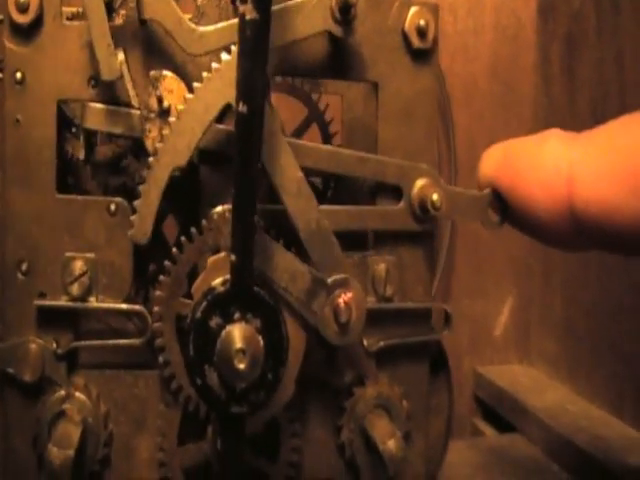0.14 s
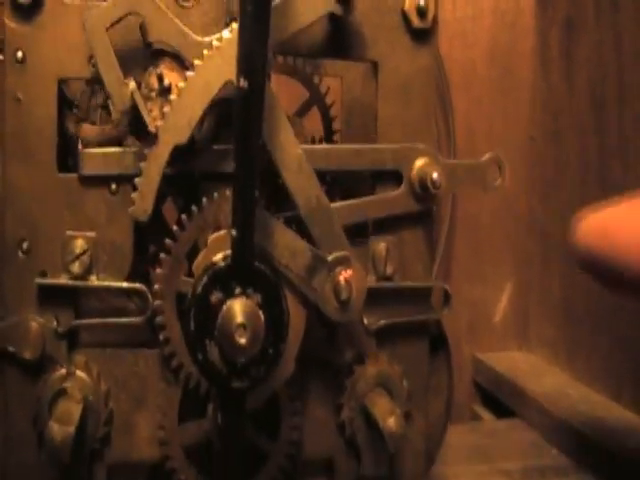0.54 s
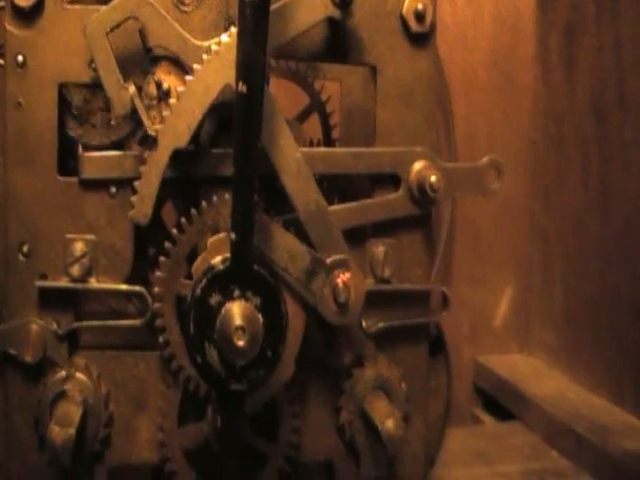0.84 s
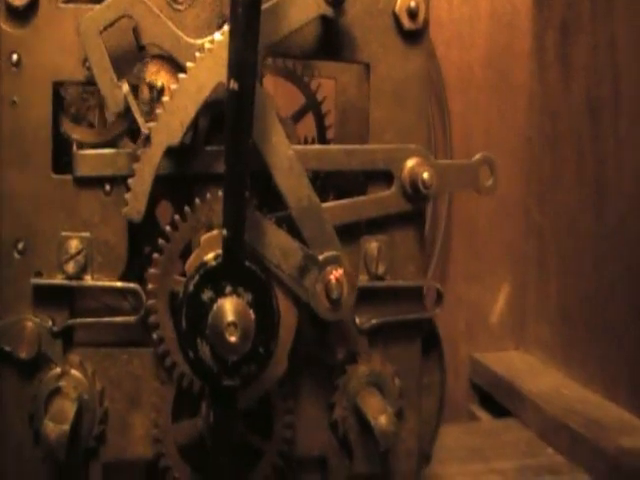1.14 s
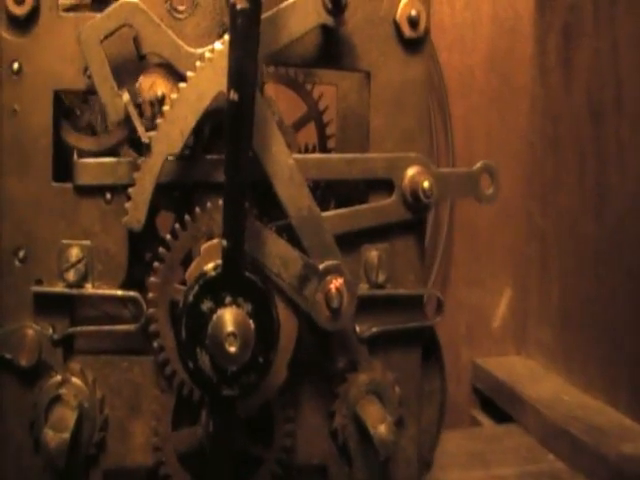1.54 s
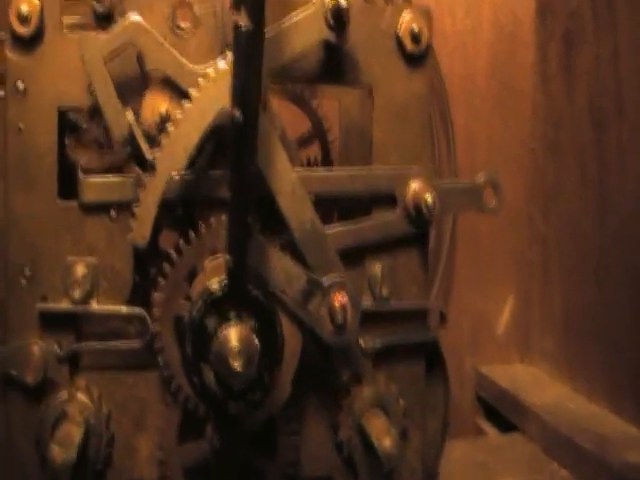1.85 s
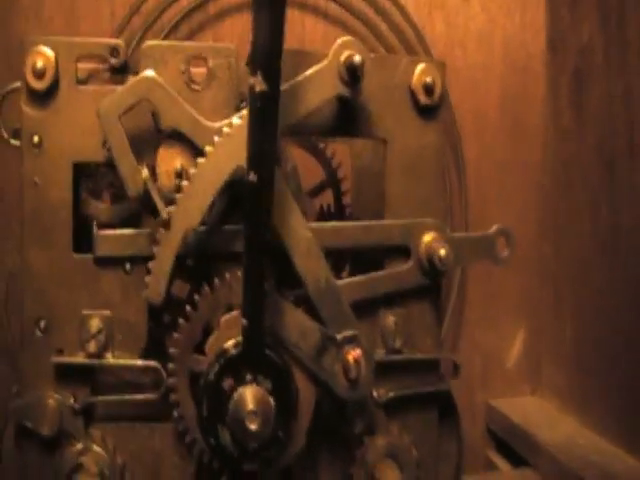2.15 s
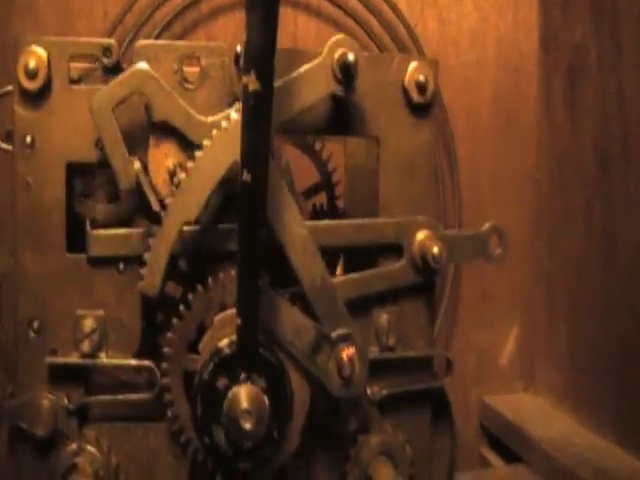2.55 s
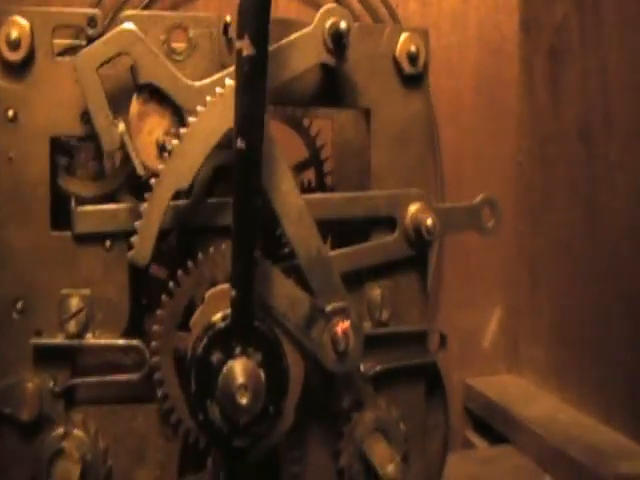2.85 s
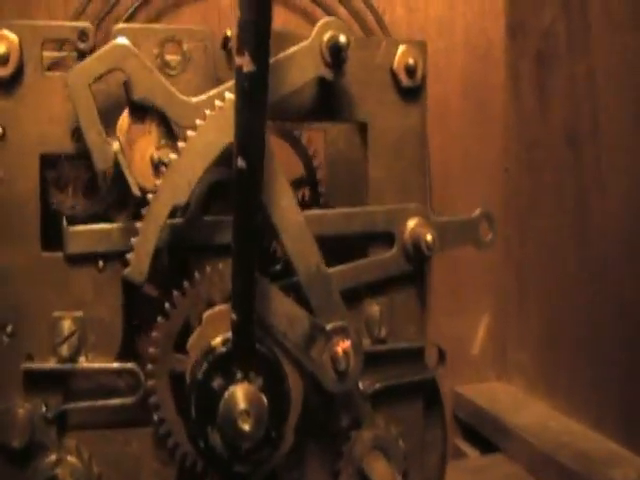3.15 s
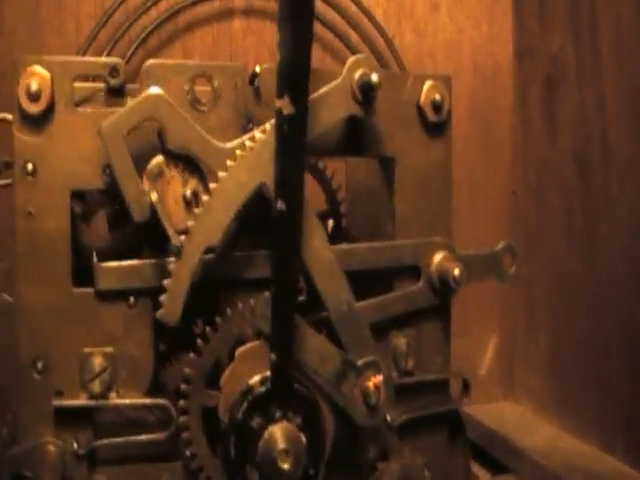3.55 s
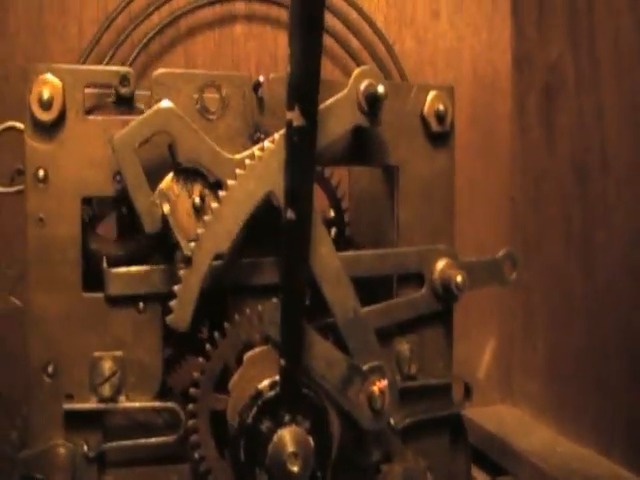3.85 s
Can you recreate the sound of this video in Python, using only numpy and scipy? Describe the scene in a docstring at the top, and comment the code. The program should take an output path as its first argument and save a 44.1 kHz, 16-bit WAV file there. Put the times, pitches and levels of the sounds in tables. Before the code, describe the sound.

Clock gears whir after a lever is tripped: light click and dull thud, hard clacks, quickening tooth ticks merging into a bright metallic buzz, with knocks and wavering plate ring; close stereo microphone, short room tail.

```python
"""A faint hiss and hum come first, then a finger trips a lever in a brass clock movement in a wooden case: a click,
a thud, a triple clack. The gear train runs up; a pinion ticks tooth by tooth, now and then jumping one, the plates
ring and levers knock on the way; the escapement beats throughout. Knocks and teeth send impulses and noise bursts
through the resonances of lever, wheels, plates, panel and case; beats and dull thuds are decaying modes, rings are
noise and wavering tones. A close stereo microphone hears it all, with a short room tail on the clock."""
import sys
import numpy as np
from scipy import signal
from scipy.fft import rfft, irfft, next_fast_len
from scipy.io import wavfile

SR = 44100
rng = np.random.default_rng(int(sys.argv[2]) if len(sys.argv) > 2 else 0)


def unload_audio(sound):
    """Save the sound as a 16-bit wav file, at the path given as the first command line argument."""
    columns = np.transpose(np.atleast_2d(sound))
    # keep every value between -1 and 1, then stretch to whole-number steps
    steps = np.round(np.clip(columns, -1, 1) * 32767)
    wavfile.write(sys.argv[1], SR, steps.astype(np.int16))


N = 176400


def amp(db):
    """Gain of a level in dB."""
    return 10 ** (np.asarray(db) / 20)


def at_hz(points, hz):
    """Read a spectrum on a log frequency axis, held flat beyond its ends."""
    p = np.array(points)
    return np.interp(np.log(hz), np.log(p[:, 0]), p[:, 1])


def drift(rate_hz):
    """Slow random wander with spread 1: noise through a two-pole low-pass, run at SR / 40."""
    step = 40
    r = np.exp(-2 * np.pi * rate_hz * step / SR)
    noise = rng.standard_normal(N // step + 2002)
    slow = signal.lfilter([1], [1, -2 * r, r * r], noise)[2000:]  # drop the filter's start
    return np.interp(np.arange(N) / step, np.arange(len(slow)), slow / slow.std())


def bursts(times, gains, rise_s, t60s):
    """Envelope of contacts: each rises quickly and falls exponentially, and they add up."""
    out = np.zeros(N + SR)
    for s, gain, t60 in np.broadcast(times, gains, t60s):
        t = np.arange(int(max(t60, .002) * SR)) / SR
        start = int(s * SR)
        out[start:start + len(t)] += gain * (1 - np.exp(-t / rise_s)) * amp(-60 * t / t60)
    return out[:N]


def clicks(times, db):
    """The hard instant of contact: one impulse each."""
    out = np.zeros(N)
    out[(times * SR).astype(int)] = amp(db)
    return out


def struck(events, modes):
    """Each blow sets a bank of exponentially decaying two-pole modes ringing."""
    s, db = np.transpose(events)
    hits = clicks(s, db) + 1e-18  # tiny offset keeps the filters off denormals
    out = 0
    for hz, level_db, t60 in modes:
        r, w = amp(-60 / (t60 * SR)), 2 * np.pi * hz / SR
        mode = signal.lfilter([.5, 0, -.5], [1, -2 * r * np.cos(w), r * r], hits)
        out = out + amp(level_db) * mode
    return out


# left-right likeness of the clock's noise: f/Hz, likeness (0 to 1)
LIKENESS = [(60, 0.46), (130, 0.63), (280, 0.62), (620, 1), (1340, 1), (2920, 0.92), (6360, 0.53),
            (13800, 0.035)]
# stereo balance, left over right: f/Hz, level/dB
LEFT_OVER_RIGHT = [(60, -13), (110, -16), (200, -5.5), (370, -6.5), (670, -6.5), (1230, -5.0), (2260, -4),
                   (4130, -4.5), (7560, -3), (13800, -5)]
PHASED = .3  # share of the left-right unlikeness that is only a shift of phase


def body(envelope, colour, modes, blows=0, likeness=LIKENESS, phased=PHASED):
    """Blows and noise through a causal colour and resonances, spread to stereo; mean power gain 1 before balance."""
    size = 2 * next_fast_len(N // 2 + SR // 8)
    hz = np.maximum(np.arange(size // 2 + 1) * SR / size, 1)
    shape = 1 + sum(amp(db) / (1 + 2j * (hz - f_hz) / width) for f_hz, width, db in modes)
    # folding the cepstrum makes the broad colour minimum-phase
    cepstrum = irfft(np.log(amp(at_hz(colour, hz))), size)
    fold = np.r_[1, np.full(size // 2 - 1, 2), 1, np.zeros(size // 2 - 1)]
    shape = shape * np.exp(rfft(cepstrum * fold))
    shape = shape / np.sqrt(np.mean(abs(shape) ** 2))
    noise = rng.uniform(-1, 1, (2, N)) * np.sqrt(3)  # rms 1
    mid, side = rfft(envelope * noise + blows * np.array([[1], [0]]), size)
    share = np.clip(phased, 0, 1)
    side = np.sqrt(share) * 1j * mid + np.sqrt(1 - share) * side
    alike = np.clip(at_hz(likeness, hz), 0, 1)
    pan = amp(at_hz(LEFT_OVER_RIGHT, hz) / 2)
    common = np.sqrt((1 + alike) / 2) * mid
    opposed = np.sqrt((1 - alike) / 2) * side
    return irfft(shape * np.array([(common + opposed) * pan, (common - opposed) / pan]), size)[:, :N]


# colour of the hiss: f/Hz, relative level/dB per Hz
HISS = [(18, -93), (30, -62), (68, -42), (91, -25.5), (156, -19.5), (172, -21), (247, -9.5), (274, -17.5),
        (354, -4), (393, -17), (435, -8.5), (548, -15.5), (656, -7.5), (709, -15), (827, -6), (917, -13),
        (7360, -26.5), (9520, -8.5), (11800, -22.5), (14000, -39.5)]
# left-right likeness of the hiss: f/Hz, likeness (0 to 1)
HISS_LIKENESS = [(60, 0.83), (130, 0.34), (280, 0.98), (620, 0.1), (1340, 0.6), (2920, 0.4), (6360, 0.2),
                 (13800, 0.0044)]
# faint hum tones, before wander and stereo balance: f/Hz, rms level/dB
HUM = [(100, -85), (350, -76), (431, -90), (841, -65.5)]
HISS_DB = -56.5  # before stereo balance


def background():
    """Coloured hiss, and hum tones of fixed pitch whose levels wander a little."""
    t = np.arange(N) / SR
    hum = 0
    for hz, db in HUM:
        level = np.sqrt(2) * amp(db + drift(6.7))
        hum = hum + level * np.sin(2 * np.pi * (hz * t + rng.random()))
    hiss = body(amp(HISS_DB), HISS, [], likeness=HISS_LIKENESS, phased=0)
    return hiss + hum * amp([[2.5], [-2.5]])  # the hum leans left


# escapement ticks: t/s, level/dB
TICKS = [(0.216, -46), (1.418, -46), (2.622, -44), (3.828, -44.5)]
# modes of the tick: f/Hz, relative level/dB, t60/s
TICK_MODES = [(1336, 0, 0.15), (2090, 8.5, 0.09), (3120, 9, 0.08), (4650, -8, 0.24), (4920, -5, 0.28),
              (6525, -5, .22), (7600, -8, 0.055)]
# escapement tocks: t/s, level/dB
TOCKS = [(0.846, -35), (2.05, -48), (3.256, -42)]
# modes of the tock: f/Hz, relative level/dB, t60/s
TOCK_MODES = [(1340, -2.4, 0.055), (3250, 0, 0.043), (7660, 0, .04)]
# landings that follow the tocks: t/s, level/dB
LANDINGS = [(0.864, -38.5), (2.11, -39), (3.276, -40)]
# modes of the landing: f/Hz, relative level/dB, t60/s
LANDING_MODES = [(3900, 8, 0.076), (4540, -1, 0.18), (6000, 7, .04), (7850, 2, .04), (8560, -1, 0.078)]


def escapement():
    """Tick, tock and landing each strike their own set of decaying modes."""
    return struck(TICKS, TICK_MODES) + struck(TOCKS, TOCK_MODES) + struck(LANDINGS, LANDING_MODES)


# lever knocks: t/s, contact level/dB before the snap gain,
# rattle level/dB of case, panel, plate and lever, t60/s of the rattle before the lever's share
KNOCKS = [(0.217, -24, -51.5, -59, -32.5, -30.5, 0.061), (0.223, -24, -47, -52, -41.5, -47, 0.086),
          (0.409, -38, -35.5, -52.5, -70, -58, 0.054), (0.52, -22, -55, -42, -45.5, -44, 0.081),
          (0.539, -10, -21, -18.5, -17.5, -13, 0.037), (0.543, -20, -38, -21.5, -40, -39, 0.05),
          (0.551, -15, -21, -26.5, -26.5, -11, 0.061), (0.573, -16, -40, -27.5, -38, -22.5, 0.076),
          (0.582, -22, -32.5, -41, -58, -30, 0.035), (0.841, -3, -60, -75, -48, -37, 0.054),
          (0.846, -16, -43, -53, -31, -29, 0.09), (0.865, -32, -55, -41, -48, -28, 0.11),
          (1.419, -20, -46, -53, -37.5, -36, 0.16), (2.049, -19, -47, -50, -32, -23, 0.049),
          (2.055, -22, -54, -50, -37, -24, 0.039), (2.108, -21, -51.5, -60, -43, -31, 0.25),
          (2.622, -7, -41.5, -45, -34, -25, 0.043), (2.676, -21, -61, -52, -66, -31, 0.016),
          (2.925, -19, -48, -41, -51, -39.5, 0.048), (2.958, -26, -37, -36.5, -65, -54, 0.037),
          (2.976, -18, -28.5, -39, -44, -41, 0.0097), (3.255, -3.5, -51, -43, -34.5, -29, 0.11),
          (3.275, -22.5, -51, -48, -57, -25, 0.063), (3.393, -22, -51.5, -41, -59, -34, 0.039),
          (3.555, -24, -56, -36, -34.5, -38, 0.032), (3.639, -24, -38, -33, -42, -29, 0.05),
          (3.829, -17, -47, -58, -31, -33, 0.066)]
KNOCK_RISE_S = .0005
LEVER_T60_SHARE = 0.42  # the lever's rattle is over sooner than the wood's
SNAP_DB, THUD_DB = -38, 13.5  # first contact: on the lever over contact level, on the wood over its rattle


def knocks():
    """Each lever knock gives rattle envelopes for four parts and first contacts for lever, case and panel."""
    at, contact_db, case_db, panel_db, plate_db, lever_db, t60 = np.transpose(KNOCKS)
    case, panel, plate = (bursts(at, amp(db), KNOCK_RISE_S, t60) for db in (case_db, panel_db, plate_db))
    lever = bursts(at, amp(lever_db), KNOCK_RISE_S, t60 * LEVER_T60_SHARE)
    lever_snap = clicks(at, contact_db + SNAP_DB)
    case_thud, panel_thud = clicks(at, case_db + THUD_DB), clicks(at, panel_db + THUD_DB)
    return (lever, lever_snap), (case, case_thud), (panel, panel_thud), plate


# lever resonances: f/Hz, width/Hz, level/dB over the broad colour
LEVER = [(4420, 38, 3.4), (5180, 45, 9.3), (7930, 220, 3.7), (8780, 310, 6.5), (9370, 550, 5.8)]
# broad colour of the lever: f/Hz, relative level/dB per Hz
LEVER_COLOUR = [(1500, -6), (3500, -7.5), (5000, 3.5), (6500, 1.5), (8500, 2.5), (10500, 2), (12500, -2.5),
                (14000, -27)]


def lever_rattle(rattle, snap):
    """Body settings: the knocks' snap and brief noise excite the bright resonances of the lever."""
    return rattle, LEVER_COLOUR, LEVER, snap


# forces of the train: t/s, then level/dB of tick, plate's middle band, back panel and case
DRIVE = [(0.62, -70, -41, -55, -44), (0.69, -58, -55, -57, -72), (0.86, -45, -47, -73, -73),
         (1.02, -46, -53, -69, -67), (1.18, -41, -44, -60, -62.5), (1.33, -42, -43, -56.5, -59),
         (1.44, -40, -44.5, -66, -65), (1.61, -39, -41.5, -58.5, -58.5), (1.98, -41, -43, -63, -60.5),
         (2.21, -41.5, -42, -61, -62), (2.38, -38.5, -42.5, -61, -58), (2.61, -41.5, -41, -62.5, -58),
         (2.86, -40.5, -44, -52, -58), (3.01, -40, -44, -57, -65), (3.24, -40.5, -43, -57, -56),
         (3.44, -40, -40, -49.5, -56.5), (3.66, -41.5, -43.5, -57, -55), (3.8, -40, -45.5, -51.5, -58),
         (4.0, -42, -40, -63, -59)]
# case resonances: f/Hz, width/Hz, level/dB over the broad colour
CASE = [(241, 19, 15), (356, 19, 7.5), (477, 29.6, 18), (560.6, 18.4, 14), (601, 24, 11.5)]
# broad colour of the case: f/Hz, relative level/dB per Hz
CASE_COLOUR = [(100, -44.5), (250, -12.5), (400, -1), (650, 5.5), (900, -15.5), (2000, -39)]
# back panel resonances: f/Hz, width/Hz, level/dB over the broad colour
PANEL = [(757, 47, 15), (876, 40, 5.5), (962.6, 26, 11), (1111, 33, 1.7)]
# broad colour of the panel: f/Hz, relative level/dB per Hz
PANEL_COLOUR = [(300, -27), (700, -12.5), (1000, 4.5), (1300, -3.5), (3000, -8.5)]
# plate resonances, middle band: f/Hz, width/Hz, level/dB over the broad colour
PLATE = [(1450, 17, 2.4), (1982, 14.5, 5.6), (2172, 17, 6), (2402, 25, 5.8), (2782, 146, 10.1),
         (3083, 77, 2.8), (3218, 43, 4.1), (3467, 115, 4.1)]
# broad colour of the plate: f/Hz, relative level/dB per Hz
PLATE_COLOUR = [(700, -31.5), (1300, 3.5), (2000, -2), (3000, 1.5), (4000, 0.5), (5500, -1.5), (9000, -7)]
PATCHY_DB, PATCH_HZ = -1, 33  # uneven level of the plate


def wood_and_plate(push, case_knocks, panel_knocks, plate_rattle):
    """Body settings: knocks and the push of the teeth shake case, panel and plate, each with its resonances."""
    t = np.arange(N) / SR
    s, _, *levels = np.transpose(DRIVE)
    plate, panel, case = (amp(np.interp(t, s, db)) * push for db in levels)
    (case_rattle, case_thud), (panel_rattle, panel_thud) = case_knocks, panel_knocks
    patchy = amp(PATCHY_DB * drift(PATCH_HZ))
    return [(case + case_rattle, CASE_COLOUR, CASE, case_thud),
            (panel + panel_rattle, PANEL_COLOUR, PANEL, panel_thud),
            (plate * patchy + plate_rattle, PLATE_COLOUR, PLATE)]


# dull thuds of the case: t/s, level/dB
THUDS = [(0.556, -39.5), (3.655, -43.5)]
# modes of the thud: f/Hz, relative level/dB, t60/s
THUD_MODES = [(354.6, -0.65, 0.18), (451, -3, 0.11)]


def case_thuds():
    """Dull blows ring two low modes of the case."""
    return struck(THUDS, THUD_MODES)


# level of the plate's strongest ring: t/s, level/dB
RINGING = [(0.62, -54), (0.65, -79), (0.85, -57), (0.89, -56), (1.25, -45.5), (1.29, -49), (1.32, -45),
           (1.36, -51), (1.7, -46.5), (1.73, -41), (2.0, -53.5), (2.05, -44.5), (2.19, -55), (2.28, -43.5),
           (2.33, -45.5), (2.36, -59), (2.45, -59), (2.58, -54), (2.66, -56), (2.84, -43), (2.94, -52.5),
           (3.19, -57), (3.28, -44.5), (3.3, -50.5), (3.58, -47), (3.61, -72), (3.64, -48), (3.72, -60),
           (3.81, -54), (3.84, -50.5), (4.0, -40.5)]
# resonances of the ring: f/Hz, width/Hz, level/dB over the broad colour
RING = [(1271.4, 41, 24.9), (1355, 75, 17.2)]
# broad colour of the ring: f/Hz, relative level/dB per Hz
RING_COLOUR = [(600, -63), (1100, 4.5), (1300, 7.5), (1500, -14.5), (3000, 0.5)]
# speed of the train, from its start: t/s, speed/teeth per s
SPEED = [(0.62, 56.66), (0.7, 30.92), (0.78, 53.62), (0.86, 45.17), (0.94, 78.64), (1.03, 90.25),
         (1.14, 108.69), (1.27, 116.39), (1.4, 124.28), (1.53, 132.03), (1.66, 142.49), (1.79, 146.79),
         (1.92, 152.01), (2.05, 154.87), (2.18, 149.5), (2.31, 156.64), (2.44, 154.41), (2.57, 142.08),
         (2.7, 138.24), (2.83, 141.72), (2.96, 138.19), (3.09, 128.01), (3.22, 128.93), (3.35, 134.54),
         (3.48, 135.4), (3.61, 135.3), (3.74, 132.37), (3.87, 136.16), (4.0, 133.31)]
START_S = SPEED[0][0]
SING_HZ, SING_WANDER_HZ = 1259, 8.964  # centre and spread of the singing pitch
SING_DB = -1  # peak of the tone against the ring's level


def plate_ring():
    """The plate's strongest ring: body settings for its noise, and a sine of wavering pitch, on one envelope."""
    t = np.arange(N) / SR
    ring = amp(np.interp(t, *np.transpose(RINGING))) * (t >= START_S)
    pitch = SING_HZ + SING_WANDER_HZ * drift(21.1)
    sing = ring * amp(SING_DB) * np.sin(2 * np.pi * np.cumsum(pitch) / SR)
    return (ring, RING_COLOUR, RING), sing


# teeth of the run-up, one by one: t/s, level/dB before the contact gain
SLOW_TEETH = [(0.6364, -68), (0.667, -48), (0.6927, -36), (0.718, -40.5), (0.743, -47), (0.765, -37.5),
              (0.7864, -35.5), (0.8056, -56), (0.822, -47), (0.8895, -33.5), (0.903, -39), (0.9174, -40),
              (0.9306, -39), (0.9428, -33), (0.956, -39), (0.969, -40), (0.9816, -30.5), (0.993, -34.5),
              (1.005, -35), (1.016, -40), (1.026, -30.5), (1.037, -37), (1.048, -36), (1.059, -32.5)]
# teeth that are jumped and barely touch: t/s
JUMPED = [1.832, 1.872, 1.885, 1.912, 1.925, 1.938, 1.971, 2.01, 2.023, 2.173, 2.187, 2.2, 2.253, 2.292,
          2.304, 2.343, 2.356, 2.368, 2.381, 2.394, 2.413, 2.426, 2.433, 2.446, 2.459, 2.465, 2.485, 2.519,
          2.533, 2.589, 2.603, 2.617, 2.66, 2.717, 2.768, 2.782, 2.817, 2.831, 2.86, 2.874, 2.903, 2.917,
          2.982, 3.042, 3.057, 3.072, 3.111, 3.127, 3.173, 3.534, 3.549, 3.601, 3.615, 3.645, 3.862]
FIRST_TOOTH = 1.04  # teeth to turn before the count reaches one
EVEN_FROM_S = 1.066  # from here the speed curve places the teeth
JUMPED_DB, TOOTH_SPREAD_DB, TOOTH_JITTER_S = -19, 3, .0003
CONTACT_DB, TICK_CREST_DB = 4.5, 11  # contact gain of every tooth; gain of the even teeth over their force
TICK_RISE_S, TICK_T60_S = .001, .008
TICK_TAIL_DB, TICK_TAIL_T60_S = -20, .024
TOOTH_SNAP_DB, TOOTH_SNAP_LAG_S = 1, .0008  # hardest contact of a tooth over its rattle, and its lag
PUSH_LAG_S, PUSH_RISE_S, PUSH_T60_S = .0014, .0023, .025
RUB_DB = -11.5  # steady rub against the rms of the pushes, before both are levelled


def teeth():
    """Integrated speed places the teeth: each has a tick, a hard contact and a later, duller push."""
    t = np.arange(N) / SR
    s, rate = np.transpose(SPEED)
    turned = np.cumsum(np.interp(t, s, rate) * (t >= START_S)) / SR + 1 - FIRST_TOOTH
    even = np.interp(np.arange(1, turned[-1]), turned, t)
    even = even[even > EVEN_FROM_S]
    chance = rng.standard_normal((len(even), 3))  # of time, tick level and push level
    jumped = abs(even[:, None] - np.ravel(JUMPED)).min(axis=1) < .002
    slow, slow_db = np.transpose(SLOW_TEETH)
    times = np.r_[slow, even + TOOTH_JITTER_S * chance[:, 0]]

    force_db = np.interp(even, *np.transpose(DRIVE)[:2])
    even_db = force_db + TICK_CREST_DB + TOOTH_SPREAD_DB * chance[:, 1] + JUMPED_DB * jumped
    tick_db = CONTACT_DB + np.r_[slow_db, even_db]
    tick = bursts(times, amp(tick_db), TICK_RISE_S, TICK_T60_S)
    tick = tick + bursts(times, amp(tick_db + TICK_TAIL_DB), TICK_RISE_S, TICK_TAIL_T60_S)
    snap_times = np.minimum(times + TOOTH_SNAP_LAG_S, (N - 1) / SR)
    snap = clicks(snap_times, TOOTH_SNAP_DB + tick_db)

    even_push_db = TOOTH_SPREAD_DB * chance[:, 2] + JUMPED_DB / 2 * jumped
    push_db = np.r_[slow_db - slow_db.mean(), even_push_db]
    push = bursts(times + PUSH_LAG_S, amp(push_db), PUSH_RISE_S, PUSH_T60_S)
    push = push / np.sqrt(np.mean(push ** 2)) + amp(RUB_DB) * (t >= START_S)
    return tick, snap, push / np.sqrt(np.mean(push ** 2))


# wheel resonances heard early: f/Hz, width/Hz, level/dB over the broad colour
WHEELS_EARLY = [(4575, 79, 13), (4870, 90, 10.5), (7170, 117, 14.5), (8400, 160, 2), (8980, 190, 13.5),
                (10070, 400, 5.5)]
# wheel resonances heard late: f/Hz, width/Hz, level/dB over the broad colour
WHEELS_LATE = [(4574, 47, 16.4), (5940, 105, 7.5), (6780, 120, 3.3), (7520, 120, 4.3), (8610, 230, 14.4),
               (9300, 160, 2.9), (11300, 280, 3.6)]
# broad colour of the wheels: f/Hz, relative level/dB per Hz
WHEEL_COLOUR = [(1500, -16), (2700, -15), (3800, -9), (5000, -2.5), (6500, 1.5), (8500, 0), (10500, 0),
                (12500, -0.5), (14000, -27)]
SHIFT_S, SHIFT_SPAN_S = 2.4, 0.37  # middle and time scale of the crossfade


def wheels(tick, snap):
    """Body settings: ticks ring the wheels; as the microphone shifts, one set of resonances fades to another."""
    t = np.arange(N) / SR
    late = 1 / (1 + np.exp((SHIFT_S - t) / SHIFT_SPAN_S))
    fade_out, fade_in = np.sqrt(1 - late), np.sqrt(late)
    return [(tick * fade_out, WHEEL_COLOUR, WHEELS_EARLY, snap * fade_out),
            (tick * fade_in, WHEEL_COLOUR, WHEELS_LATE, snap * fade_in)]


# plate's upper ring, before a small trim and the push: t/s, level/dB
UPPER = [(0.9, -61.5), (1.24, -52), (1.9, -58.5), (2.09, -51), (2.47, -58), (2.54, -51), (2.69, -59),
         (3.0, -51.5), (3.6, -58.5), (3.9, -51)]
# resonance of the upper ring: f/Hz, width/Hz, level/dB over the broad colour
UPPER_RING = [(1767, 30, 15)]


def upper_ring(push):
    """Body settings: the push of the teeth feeds noise to a higher resonance of the plate."""
    t = np.arange(N) / SR
    level = amp(np.interp(t, *np.transpose(UPPER), -120) - 0.5)
    colour = [(600, -33), (1790, -16), (5000, -30)]  # f/Hz, relative level/dB per Hz
    return level * push, colour, UPPER_RING


# a part rubs and the panel sings, before wander: t/s, f/Hz, rms level/dB
RUBBING = [(3.3, 967, -61), (3.4, 962, -49), (3.48, 950, -51), (3.55, 935, -53), (3.62, 946, -52.5),
           (3.65, 1000, -64)]


def rubbing():
    """A sine with wavering pitch and fluttering level."""
    t = np.arange(N) / SR
    s, hz, db = np.transpose(RUBBING)
    pitch = np.interp(t, s, hz) + SING_WANDER_HZ * drift(20)
    level = np.sqrt(2) * amp(np.interp(t, s, db, -120, -120) + 3.2 * drift(30))
    return level * np.sin(2 * np.pi * np.cumsum(pitch) / SR)


def movement():
    """Teeth and knocks together drive wheels, lever, plates and case; beats, thuds and tones join them."""
    tick, snap, push = teeth()
    lever, case, panel, plate_rattle = knocks()
    shaken = wood_and_plate(push, case, panel, plate_rattle)
    ring, sing = plate_ring()
    tones = sing + rubbing() + case_thuds() + escapement()
    pan = amp(at_hz(LEFT_OVER_RIGHT, SING_HZ) / 2)  # all tones take the balance at the singing pitch
    parts = [*wheels(tick, snap), upper_ring(push), lever_rattle(*lever), ring, *shaken]
    return sum(body(*part) for part in parts) + tones * np.array([[pan], [1 / pan]])


ROOM_DB, ROOM_T60_S = -18.5, 0.24


def room(x):
    """Reverberation as a short dying noise tail, independent for each side."""
    t = np.arange(int(ROOM_T60_S * SR)) / SR
    tail = rng.standard_normal((2, len(t))) * amp(-60 * t / ROOM_T60_S) * (t > .003)
    tail = tail / np.sqrt(np.sum(tail ** 2, axis=1, keepdims=True))
    return amp(ROOM_DB) * signal.fftconvolve(x, tail, axes=1)[:, :N]


LOWEST_HZ = 200  # the movement is heard with little below this


def scene():
    """The movement loses its lowest sound, then gains its room and the background."""
    high_pass = signal.butter(2, LOWEST_HZ, "high", fs=SR, output="sos")
    clock = signal.sosfilt(high_pass, movement())
    return clock + room(clock) + background()


CUTOFF_HZ = 14400


def record(dry):
    """A steep low-pass cuts the top, 60 dB down from the cutoff."""
    return signal.sosfilt(signal.cheby2(12, 60, CUTOFF_HZ, fs=SR, output="sos"), dry)


dry = scene()
out = record(dry)
unload_audio(out)
```